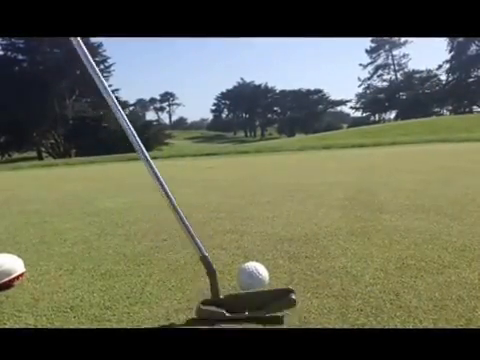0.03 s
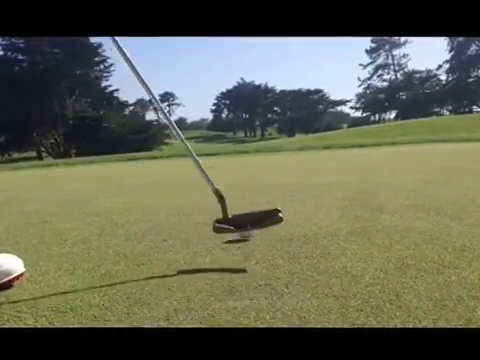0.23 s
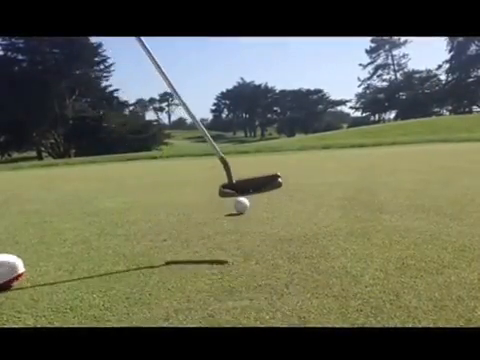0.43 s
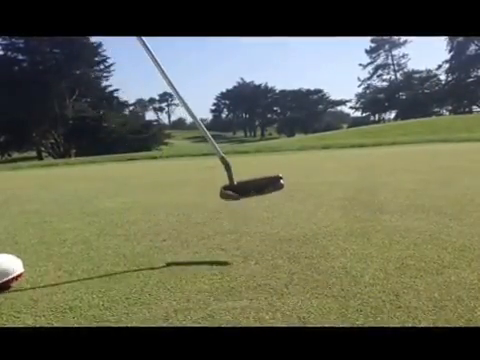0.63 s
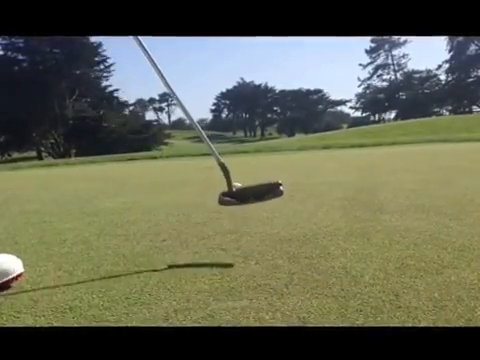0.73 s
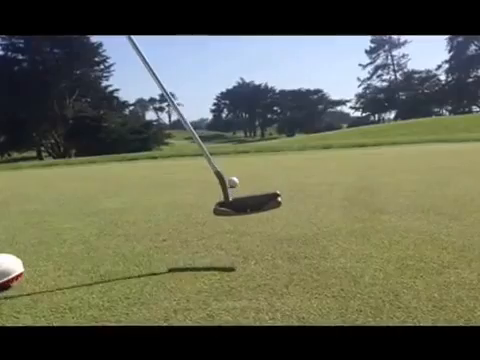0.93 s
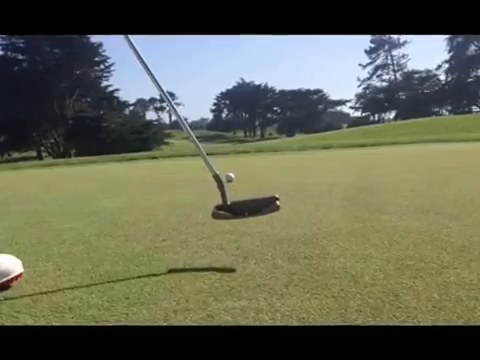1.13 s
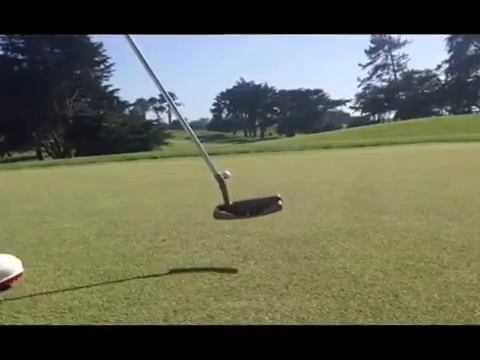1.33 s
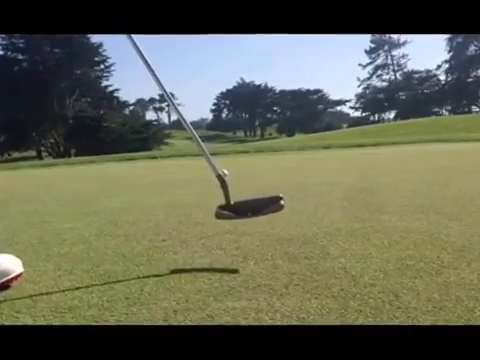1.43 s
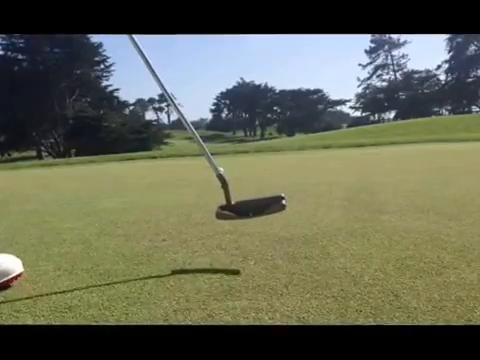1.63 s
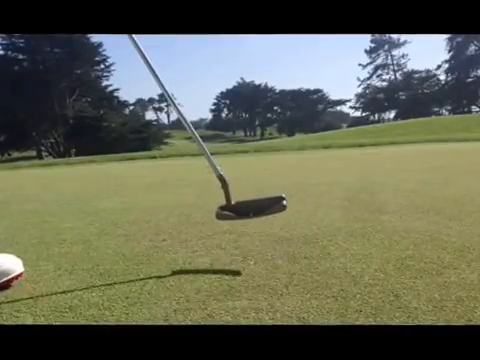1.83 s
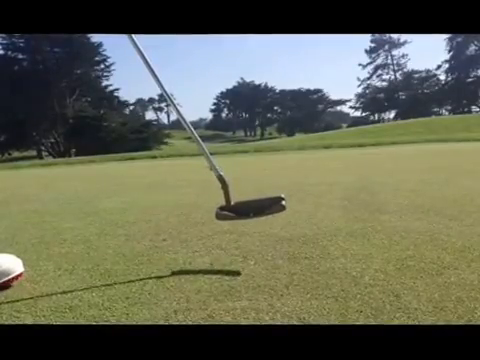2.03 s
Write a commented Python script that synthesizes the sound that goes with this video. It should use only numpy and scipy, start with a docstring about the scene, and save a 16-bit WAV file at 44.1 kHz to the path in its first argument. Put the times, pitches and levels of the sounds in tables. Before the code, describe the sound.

A putter strikes a golf ball once with a short, dry click close to the microphone. Afterwards only a light wind rumble and faint hiss remain on the open green, with a barely audible distant bird.

```python
"""A putter taps a golf ball on an open green, close to the microphone.
The contact force accelerates the ball, which radiates one dry click; head, shaft and ball then ring
in damped modes for a few hundredths of a second, and the turf scatters the sound back.
Light wind rumbles throughout over faint hiss, with a small tick, a soft rustle and a far-off bird."""
import sys
import numpy as np
from scipy import signal
from scipy.fft import rfft, irfft
from scipy.io import wavfile
from scipy.ndimage import uniform_filter1d

SR = 44100
rng = np.random.default_rng(int(sys.argv[2]) if len(sys.argv) > 2 else 0)


def digitize_waveform(pressure):
    """Quantize a signal to 16-bit integers and store it at the path in sys.argv[1].

    Rows of a 2-D input are taken as channels; values are limited to [-1, 1].
    """
    field = np.atleast_2d(pressure).T
    bounded = np.clip(field, -1, 1)
    quanta = np.round(bounded * 32767).astype(np.int16)
    wavfile.write(sys.argv[1], SR, quanta)


N = 92610


def undb(db):
    """Amplitude ratio: tenfold for every 20 dB."""
    return 10 ** (np.asarray(db) / 20)


def unit(x):
    """Normalisation to rms 1."""
    return x / np.sqrt(np.mean(x ** 2))


def noise(spectrum, lo_hz=0, hi_hz=SR):
    """Spectral shaping: white noise coloured between two band edges, at rms 1."""
    f = np.maximum(np.fft.rfftfreq(N, 1 / SR), 1)
    hz, db = np.array(spectrum).T
    gain = undb(np.interp(np.log(f), np.log(hz), db)) * (f >= lo_hz) * (f <= hi_hz)
    return unit(irfft(rfft(rng.standard_normal(N)) * gain, N))


def flutter(rate_hz):
    """Random modulation: straight ramps between random values, at rms 1."""
    hold = int(SR / rate_hz)
    steps = rng.standard_normal(N)[np.arange(N) // hold]
    return unit(uniform_filter1d(steps, hold))


def burst(age, attack, t60):
    """Exponential decay, 60 dB in t60 seconds, after a linear rise."""
    return np.clip(age / attack, 0, 1) * np.exp(-np.log(1000) * np.maximum(age - attack, 0) / t60)


# Spectrum of the open air (frequency [Hz], relative density [dB])
AIR_SPECTRUM = [(880, -30), (1500, -1.5), (2230, -2), (2600, 0.5), (2890, -1.5), (3470, -2), (5450, -6),
                (14300, -10), (15000, -10.5)]
CROSSOVER_HZ = 1500  # hiss above, rumble below
def air_hiss():
    """Stationary noise: a faint, smooth hiss of open air."""
    return undb(-64.5) * noise(AIR_SPECTRUM, lo_hz=CROSSOVER_HZ)


# Spectrum of the wind (frequency [Hz], relative density [dB])
RUMBLE_SPECTRUM = [(15, -61), (25, -35), (59, -27), (129, -4), (176, 1), (253, -2.5), (321, -7.5),
                   (1010, -24.5), (1500, -35.5), (1950, -62), (3300, -120)]
def wind_rumble():
    """Amplitude modulation: the wind's low noise flutters by about a decibel."""
    level_db = -46.5 + flutter(rate_hz=16)
    return undb(level_db) * noise(RUMBLE_SPECTRUM, hi_hz=CROSSOVER_HZ)


# Swell of the breeze (time [s], level [dB])
BREEZE_SWELL = [(0, -66), (1.1, -61.5), (1.6, -61.5), (2.0, -58.5), (2.1, -59.5)]
# Spectrum of the breeze (frequency [Hz], relative density [dB])
BREEZE_SPECTRUM = [(200, -24), (600, 8.5), (1100, -2), (2200, -12), (4000, -27), (12000, -19)]
def breeze(t):
    """Noise under a slow envelope: the breeze freshens while its spectrum keeps its shape."""
    times, levels_db = np.array(BREEZE_SWELL).T
    return undb(np.interp(t, times, levels_db)) * noise(BREEZE_SPECTRUM)


# Whistles of a distant bird (onset [s], duration [s], frequency [Hz], level [dB])
BIRD_NOTES = [(1.745, .1, 2540, -66), (1.92, .08, 2540, -70), (2.05, .07, 2120, -64.5)]
def bird(t):
    """Spectral broadening: distance blurs each note into a narrow band about a steady pitch."""
    blur_hz = 200
    out = np.zeros(N)
    for start, length, hz, db in BIRD_NOTES:
        phase = 2 * np.pi * hz * t
        note = unit(flutter(blur_hz) * np.sin(phase) + flutter(blur_hz) * np.cos(phase))
        arch = np.sin(np.pi * np.clip((t - start) / length, 0, 1))
        out += undb(db) * note * arch
    return out


# A tick and a rustle (onset [s], level [dB], centre [Hz], bandwidth per pass [Hz], attack [s], T60 [s])
SCUFFS = [(.039, -53.5, 2700, 1200, 0.00092, .022), (.829, -59, 3480, 1890, .012, 0.19)]
def rustles(t):
    """Band-limited transients: each faint scuff is noise passed twice through a resonator."""
    out = np.zeros(N)
    for start, db, hz, width, attack, t60 in SCUFFS:
        b, a = signal.iirpeak(hz, hz / width, fs=SR)
        scuff = signal.lfilter(b, a, signal.lfilter(b, a, rng.standard_normal(N)))
        out += undb(db) * unit(scuff) * burst(t - start, attack, t60)
    return out


# Eddies meeting the microphone (onset [s], level [dB])
EDDIES = [(1.194, -36), (1.241, -34)]
def buffets(t):
    """Turbulent pressure: each eddy bumps the microphone for a few low cycles, with no deep bass."""
    bump_hz, low_cut_hz = 168, 107
    bumps = np.zeros(N)
    for start, db in EDDIES:
        age = t - start
        bumps += undb(db) * np.sin(2 * np.pi * bump_hz * age) * burst(age, attack=.0049, t60=.045)
    return signal.sosfilt(signal.butter(4, low_cut_hz, "high", fs=SR, output="sos"), bumps)


# Spectrum returned by the turf (frequency [Hz], relative density [dB])
TURF_SPECTRUM = [(150, 2), (350, -13), (800, 7), (1300, -6.5), (2300, -18.5), (3300, -13), (5000, -35),
                 (12000, -38)]
def turf_scatter(age):
    """Diffuse scattering: a brief return from nearby turf, a fainter, longer one from further off."""
    near = undb(-23) * burst(age, attack=.0015, t60=.019)
    far = undb(-48) * burst(age, attack=.0015, t60=.16)
    return (near + far) * noise(TURF_SPECTRUM)


# Modes of head, shaft and ball (frequency [Hz], level [dB], T60 [s])
PUTT_MODES = [(393, -29.5, 0.042), (805, -25.5, 0.015), (1044, -16.5, .015), (1350, -24.5, 0.013),
              (1586, -29.5, 0.026), (1900, -19.5, .012), (2700, -26, 0.01), (3030, -25.5, 0.019),
              (3310, -16.5, 0.0064), (3930, -22.5, 0.0084), (5680, -38, 0.018)]
def modal_ring(age):
    """Free vibration: each struck mode rings as a damped sinusoid."""
    return sum(undb(db) * np.sin(2 * np.pi * hz * age) * np.exp(-np.log(1000) * age / t60)
               for hz, db, t60 in PUTT_MODES)


def contact_click(age):
    """Acceleration noise: the ball radiates the time derivative of the contact force."""
    force_lag_s, contact_s = .000096, .000681
    hertz_exponent = 1.35  # an elastic ball stiffens as it is squeezed
    progress = np.clip((age - force_lag_s) / contact_s, 0, 1)
    force = np.maximum(np.sin(np.pi * progress), 0) ** hertz_exponent
    slope = np.gradient(force)
    return undb(-8) * slope / np.abs(slope).max()


def putt(t, strike_s):
    """Impact sound: click, ringing and scatter add within one pass band."""
    age = np.maximum(t - strike_s, 0)
    band = signal.butter(2, [260, 9200], "band", fs=SR, output="sos")
    return signal.sosfilt(band, contact_click(age) + modal_ring(age) + turf_scatter(age))


def scene():
    """Superposition: the putt adds to the sounds of the open green in one channel."""
    t = np.arange(N) / SR
    background = air_hiss() + wind_rumble() + breeze(t) + bird(t) + rustles(t) + buffets(t)
    return (background + putt(t, strike_s=.22064))[None]


def record(dry):
    """Band limiting: a steep low-pass filter removes the highest treble."""
    cutoff_hz = 15400
    return signal.sosfilt(signal.ellip(10, .1, 70, cutoff_hz, fs=SR, output="sos"), dry)


dry = scene()
out = record(dry)
digitize_waveform(out)
```